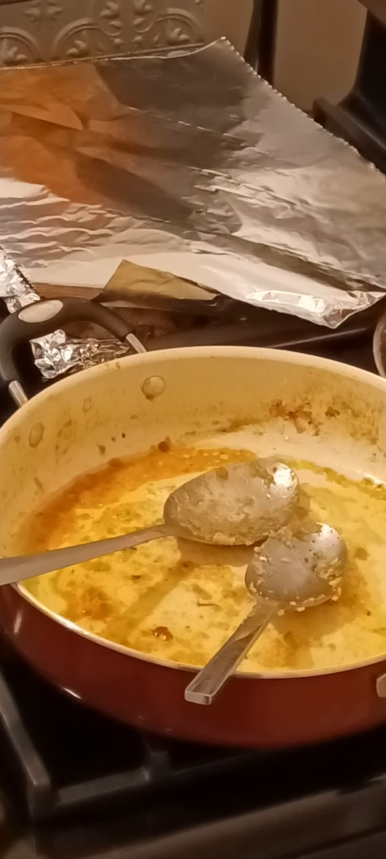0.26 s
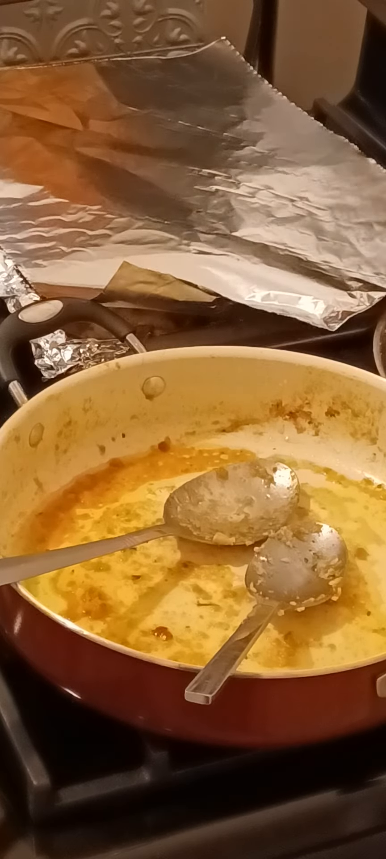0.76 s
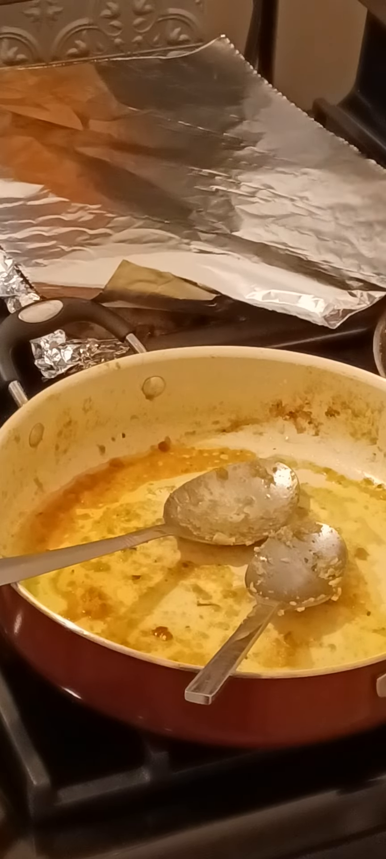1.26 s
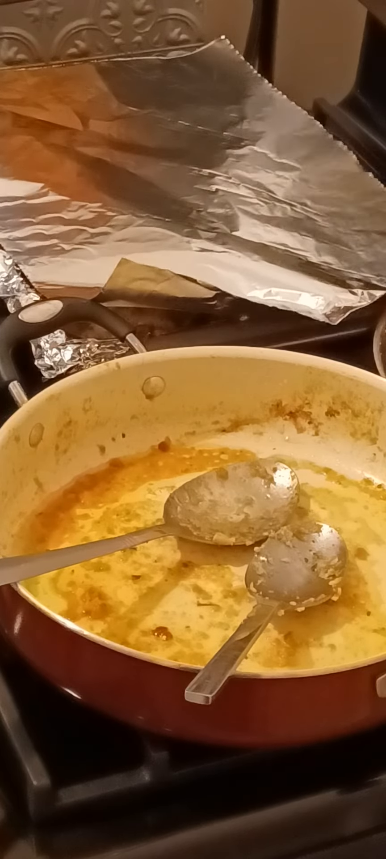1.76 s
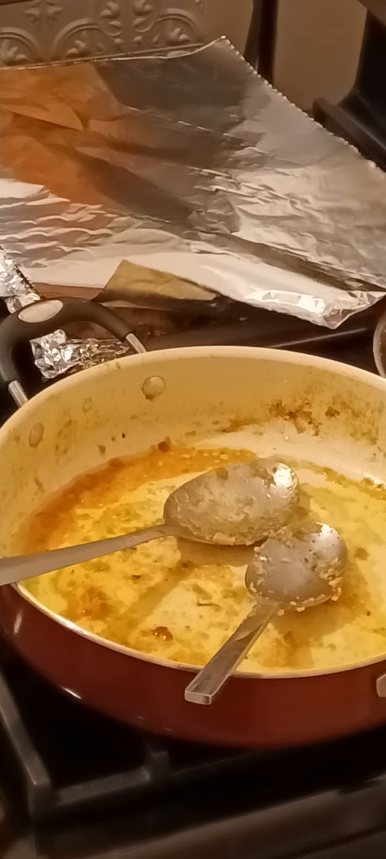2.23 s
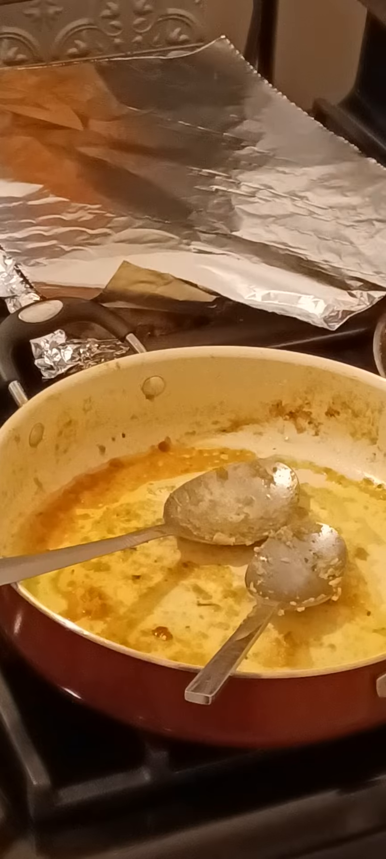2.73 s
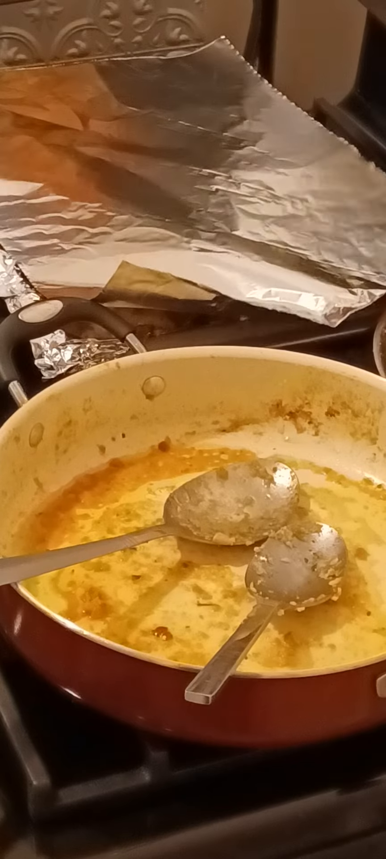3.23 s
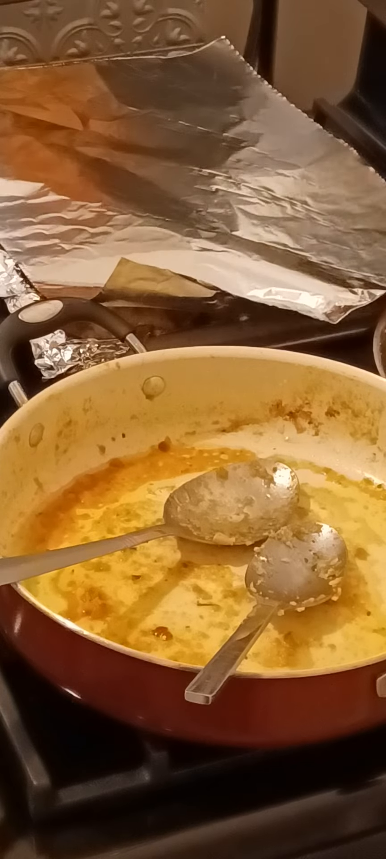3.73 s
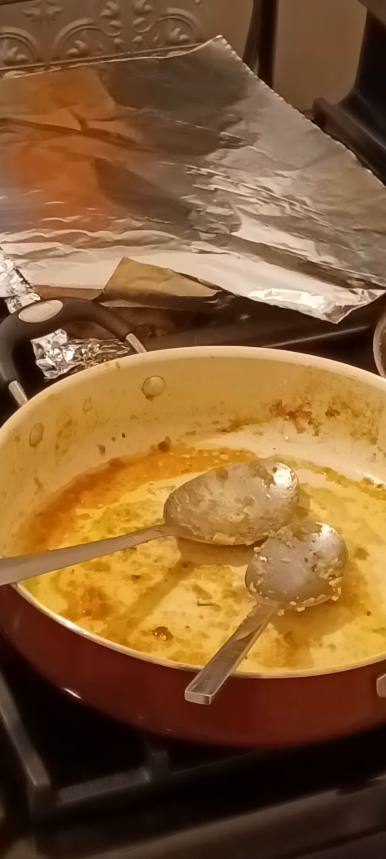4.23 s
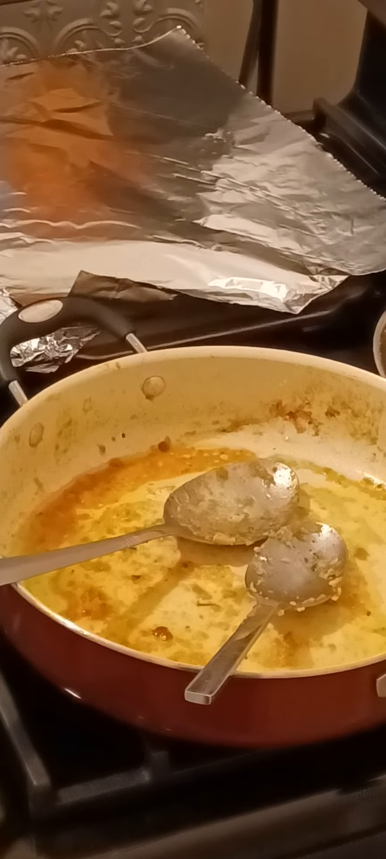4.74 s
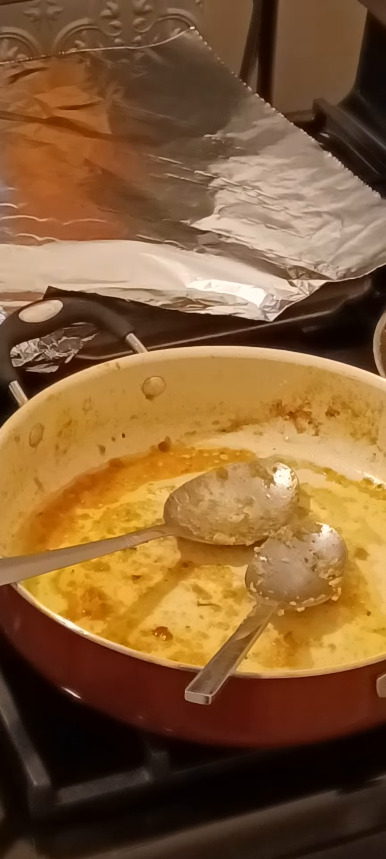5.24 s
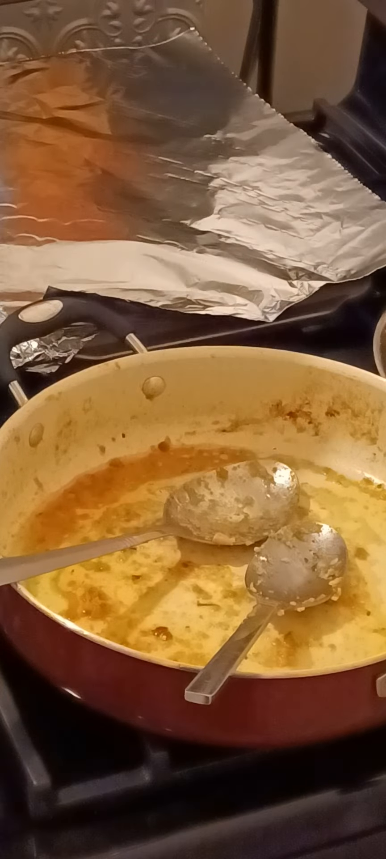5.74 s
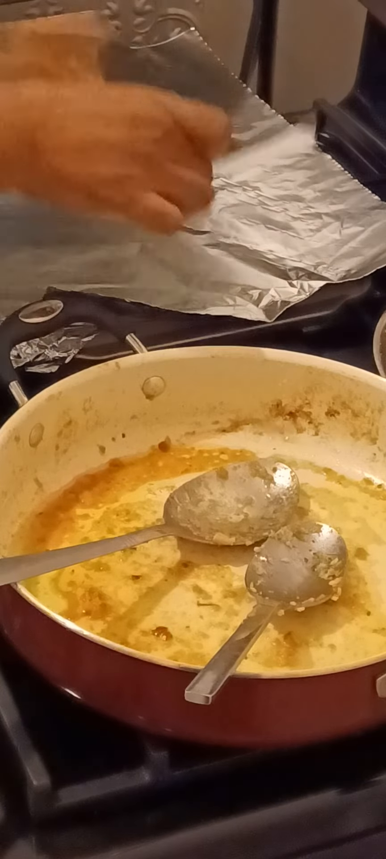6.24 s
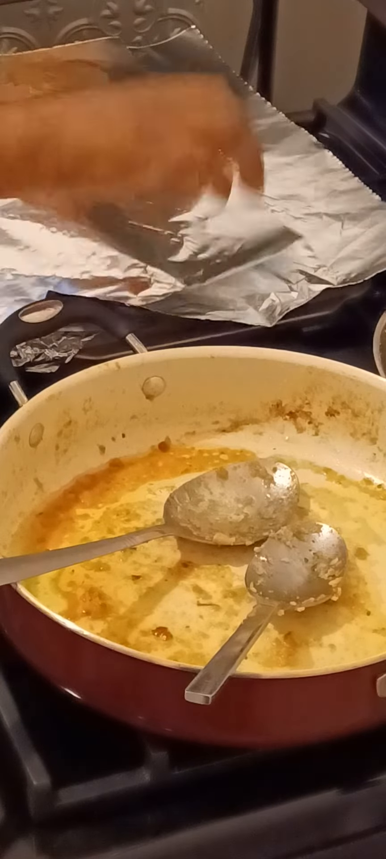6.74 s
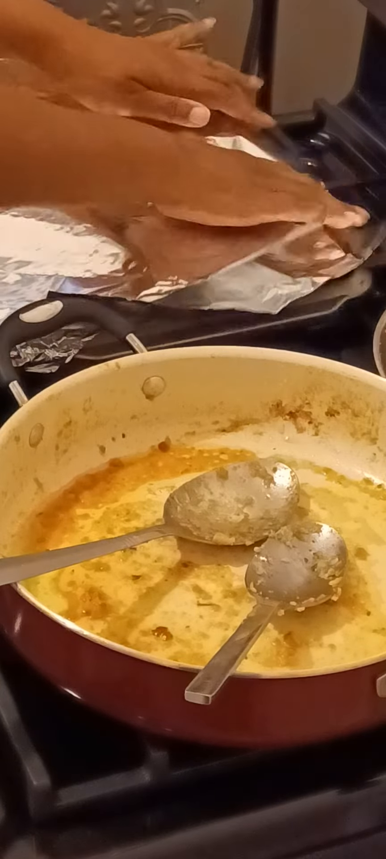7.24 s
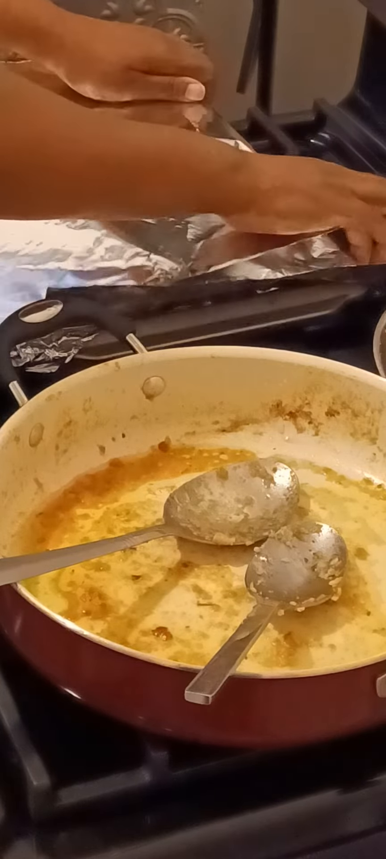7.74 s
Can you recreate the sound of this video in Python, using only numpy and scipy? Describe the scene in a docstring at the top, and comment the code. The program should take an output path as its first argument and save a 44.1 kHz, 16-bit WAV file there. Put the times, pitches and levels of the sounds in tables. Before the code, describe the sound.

Aluminium foil crinkles, is torn loudly off its roll, then laid over a dish and smoothed by hand, with a kitchen fan humming.

```python
"""Aluminium foil crackles off its roll over the hum of an extractor fan, in a small, hard-walled kitchen.
The sheet is torn along the box's saw edge, the box is put down, a dish slides over the stove, and the
sheet is carried across, laid on it and smoothed by hand. The crackle is snap-through buckling: thousands
of tiny impulses a second, blurred by reverberation. Punctures and knocks excite the box's resonances;
dish and palm sound by stick-slip friction. A phone's gain control ducks after the loud tear."""
import sys
import numpy as np
from scipy import signal
from scipy.fft import rfft, irfft
from scipy.io import wavfile
from scipy.ndimage import uniform_filter1d, minimum_filter1d

SR = 44100
rng = np.random.default_rng(int(sys.argv[2]) if len(sys.argv) > 2 else 0)


def inscribe(sig):
    """Save sig as 16-bit PCM at rate SR to the path in sys.argv[1].

    A 1-D sig is mono; a 2-D sig holds one channel per row.
    Samples are clipped to [-1, 1] before scaling.
    """
    pcm = np.round(np.clip(np.atleast_2d(sig).T, -1, 1) * 32767)
    wavfile.write(sys.argv[1], SR, pcm.astype(np.int16))


N = 351918
T = np.arange(N) / SR


def undb(db):
    """Amplitude ratio of a level in decibels."""
    return 10 ** (np.asarray(db) / 20)


def unit(x):
    """Normalisation to rms 1."""
    return x / np.sqrt(np.mean(x ** 2))


def curve(rows, column=1):
    """Linear interpolation of one table column over time."""
    rows = np.array(rows)
    return np.interp(T, rows[:, 0], rows[:, column])


def gesture(rows, column=1):
    """Amplitude envelope of a movement, silent outside its rows."""
    return undb(curve(rows, column)) * (T >= rows[0][0]) * (T <= rows[-1][0] + .01)


def along(points, hz):
    """Interpolation of (f/Hz, value) points on a log-frequency axis."""
    f, value = np.transpose(points)
    return np.interp(np.log(hz + 1), np.log(f), value)


def colour(x, points):
    """Spectral shaping by (f/Hz, level/dB) points, conserving the power of a white input."""
    hz = np.fft.rfftfreq(N, 1 / SR)
    return irfft(rfft(x) * unit(undb(along(points, hz))), N)


def drift(rate_hz):
    """Low-pass noise of rms 1: random values, each held for one period, smoothed twice."""
    hold = int(SR / rate_hz)
    steps = np.repeat(rng.standard_normal(N // hold + 1), hold)
    return unit(uniform_filter1d(uniform_filter1d(steps, hold), hold)[:N])


def clicks(per_s, spread_db):
    """Shot noise: random impulses, many small and a few large, with mean power near 1."""
    chance, size, sign = rng.random(N), rng.exponential(size=N), rng.choice([-1, 1], N)
    size = unit(undb(spread_db * np.minimum(size, 4)))
    probability = np.minimum(per_s / SR, 1)
    return (chance < probability) * sign * size / np.sqrt(probability)


# reverberation time of the kitchen: f/Hz, T60/s
ROOM_DECAY = [(100, .3), (500, 0.3), (2000, 0.38), (5000, 0.5), (10000, 0.33), (16000, 0.25)]
# level difference, left minus right: f/Hz, level/dB
STEREO_BALANCE = [(200, .5), (700, -0.6), (1300, -0.3), (2400, -0.5), (4400, 1.5), (8000, 2.3), (15000, 1)]

def kitchen(x, direct_db, lag):
    """Reverberation: direct sound, lag samples later on the right, then a decaying diffuse field."""
    t = T[:SR * 3 // 4]
    hz = np.fft.rfftfreq(len(t), 1 / SR)
    density = np.clip((t / .03) ** 2, .01, 1)  # reflections thicken with time squared
    echoes = rng.standard_normal((2, len(t))) * (rng.random((2, len(t))) < density)
    left, right = rfft(echoes / np.sqrt(density) * (t > .002))
    coherence = np.exp(-hz / 520)  # long waves reach both microphones alike
    field = np.array([left, coherence * left + np.sqrt(1 - coherence ** 2) * right])
    centres = np.geomspace(100, 16000, 9)
    response = 0
    for centre, weights in zip(centres, np.eye(len(centres))):
        fade = np.exp(-np.log(1000) * t / along(ROOM_DECAY, centre))
        band = np.interp(np.log(hz + 1), np.log(centres), weights)
        response = response + irfft(field * band, len(t)) * fade / np.sqrt(np.sum(fade ** 2))
    response[0, 0] += undb(direct_db)
    response[1, lag] += undb(direct_db)
    response /= np.sqrt(1 + undb(direct_db) ** 2)
    balance = undb(np.outer([.5, -.5], along(STEREO_BALANCE, hz)))
    response = irfft(rfft(response) * balance, len(t))
    return signal.fftconvolve(x[None], response, axes=1)[:, :N]


# weaker fan tones: multiple of the shaft rate, level/dB
SHAFT_HARMONICS = [(3, -63.5), (6, -59)]
# swells of the blade tone: centre t/s, half-width/s, gain/dB
BLADE_SWELLS = [(.68, .16, 7), (1.32, .16, 7), (2.38, .2, 5.5), (3.25, .08, 13), (3.68, .07, 11),
                (4.6, .18, 13), (5.62, .08, 11), (7.25, .05, 8), (7.65, .16, 9)]
# rumble of the moving air: f/Hz, level/dB
AIR_SPECTRUM = [(25, -31), (46, -24), (60, -16), (92, -3.5), (135, -5), (190, 1.5), (260, 1.5), (330, -2.5),
                (480, -11), (760, -11.5), (950, -19), (1250, -18), (2000, -31), (5000, -42), (15000, -56)]

def fan(shaft_hz=55.57, blade_count=4, blade_db=-54, eddy_db=-55, eddy_width_hz=30, air_db=-47.2):
    """Blade-passing tone over rumbling air: turbulence modulates it and spreads a skirt of noise."""
    turns = np.cumsum(shaft_hz * (1 + .001 * drift(3))) / SR
    phase = 2 * np.pi * blade_count * turns
    swell_db = sum(db * np.exp(-((T - s) / half) ** 2) for s, half, db in BLADE_SWELLS)
    blades = undb(blade_db + swell_db + 2.5 * drift(12)) * np.sin(phase + .4 * drift(22))
    skirt = drift(eddy_width_hz) * np.sin(phase) + drift(eddy_width_hz) * np.cos(phase)
    tones = sum(undb(db + 3.4 * drift(9)) * np.sin(2 * np.pi * k * turns + .8 * drift(14))
                for k, db in SHAFT_HARMONICS)
    mid, side = colour(rng.standard_normal((2, N)), AIR_SPECTRUM) * undb(air_db + .8 * drift(5))
    hum = np.sqrt(2) * (blades + tones) + undb(eddy_db) * skirt
    left, right = hum + .96 * mid + .22 * side, hum + .8 * mid - .3 * side
    return np.array([left, np.roll(right, 6)])


# the dish sliding on the stove: t/s, level/dB
DISH_SLIDE = [(4.32, -59), (4.37, -48.5), (4.42, -45), (4.46, -50), (4.5, -45.5), (4.58, -49), (4.67, -48),
              (4.74, -62)]
# its scrape: f/Hz, level/dB
DISH_SPECTRUM = [(50, -35), (150, -14), (230, 1), (330, 2.5), (440, -9), (530, -1.5), (850, -9), (1100, -4),
                 (1700, -7.5), (2400, -20), (5000, -38), (15000, -58)]
# a palm pressing the sheet onto the rim: t/s, level/dB
PALM_STROKE = [(7.18, -65), (7.205, -41.5), (7.25, -43), (7.32, -47), (7.5, -50), (7.68, -42.5),
               (7.85, -46.5), (7.98, -53)]
# its rub: f/Hz, level/dB
PALM_SPECTRUM = [(40, -35), (150, -21), (280, -4), (420, -11), (560, 4.5), (750, -4), (1130, 3.5),
                 (1500, -3.5), (3000, -13), (15000, -50)]

def friction():
    """Stick-slip friction: dense, uneven slips of dish over stove, then of palm over foil."""
    dish = colour(clicks(2500, spread_db=0), DISH_SPECTRUM) * gesture(DISH_SLIDE) * undb(.97 * drift(35))
    palm = colour(clicks(3000, spread_db=3.5), PALM_SPECTRUM) * gesture(PALM_STROKE)
    palm *= undb(1.9 * drift(25))
    return kitchen(dish + palm, direct_db=-8, lag=24)


# the box striking the counter: t/s, level/dB, relative thud level/dB, f/Hz favoured by the contact point
BOX_IMPACTS = [(1.753, -33.5, -8, 241), (2.717, -34.5, -22, 500), (2.766, -28, -11, 285),
               (2.794, -35, -12, 305), (2.835, -44.5, -5, 262)]
# modes rung by an impact: f/Hz, level/dB, T60/s
IMPACT_MODES = [(263, 0, .17), (305.6, 0, 0.19), (430, 1, 0.19), (502, 0.5, .12), (590, -15, .12),
                (797, 0, 0.16), (877, -2, .12), (1098, -13, 0.12), (1395, -8, 0.089)]
# thud of the counter: f/Hz, level/dB
THUD_SPECTRUM = [(30, -42), (45, -26), (62, 3), (85, -3), (130, -6), (200, -1), (350, -9), (900, -30)]
# dry scuff of cardboard: f/Hz, level/dB
SCUFF_SPECTRUM = [(100, -30), (450, -2), (900, -1), (1400, -3), (2500, -11), (8000, -40)]

def knocks(push_s=.0017, thud_s=.057, scuff_s=.048, scuff_db=-7):
    """Impact excitation: soft blows scuff the box, ring its damped modes and shake the counter."""
    out, t = np.zeros(N), T[:SR // 2]
    counter = colour(rng.standard_normal(N), THUD_SPECTRUM)
    cardboard = colour(rng.standard_normal(N), SCUFF_SPECTRUM)
    for s, db, thud_db, favoured_hz in BOX_IMPACTS:
        span = slice(int(s * SR), int(s * SR) + len(t))
        blow = undb(thud_db) * counter[span] * np.exp(-t / thud_s)
        blow += undb(scuff_db) * cardboard[span] * np.exp(-t / scuff_s)
        for hz, mode_db, t60 in IMPACT_MODES:
            lift_db = 12 * np.exp(-(np.log2(hz / favoured_hz) / .23) ** 2)
            phase = 2 * np.pi * hz * (1 + .012 * rng.standard_normal()) * t
            blow += undb(mode_db + lift_db - 3.5) * np.sin(phase) * np.exp(-np.log(1000) * t / t60)
        out[span] += undb(db) * blow * (1 - np.exp(-t / push_s))
    return kitchen(out, direct_db=4.5, lag=7)


# the roll squeaking in its box before the tear: t/s, f/Hz, level/dB
ROLL_SQUEAK = [(1.22, 473, -70), (1.29, 461, -54), (1.37, 463, -52), (1.45, 468, -48), (1.53, 480, -43.5),
               (1.59, 450, -56), (1.63, 437, -66)]
# the tear along the saw edge: t/s, level/dB, f/Hz of the freed flap, falling as it grows
TEAR_PATH = [(1.6, -51, 1200), (1.632, -24, 1800), (1.65, -16, 1850), (1.7, -23, 1960), (1.712, -9, 1420),
             (1.728, -15.5, 1400), (1.745, -22, 650), (1.79, -19, 990), (1.84, -19.5, 890),
             (1.885, -25.5, 400), (1.92, -46, 370)]
# resonances of the cardboard box: f/Hz, bandwidth/Hz, level/dB
BOX_RESONANCES = [(353, 30, 3), (418, 40, 2.5), (551, 32, 1.5), (755, 110, -2), (874, 44, -2),
                  (1038, 74, 1), (1417, 92, 0.5), (1485, 80, 1.5), (1740, 320, -2.5), (2040, 240, -1)]
# the box shaking under the teeth: f/Hz, level/dB
SHUDDER_SPECTRUM = [(30, -50), (55, -26), (100, -5), (170, 2), (280, -3), (600, -25)]

def tear(teeth_per_s=1100, shudder_db=-19):
    """Forced vibration: the roll squeaks, then punctures drive the box, most near the flap's pitch."""
    highpass = signal.butter(3, 260, "high", fs=SR, output="sos")
    punctures = signal.sosfilt(highpass, clicks(teeth_per_s, spread_db=1.5))
    flap_hz = curve(TEAR_PATH, 2)
    rasp = 0
    for k, (hz, width, db) in enumerate(BOX_RESONANCES):
        ring = signal.lfilter(*signal.iirpeak(hz, hz / width, SR), punctures)
        lift_db = 7 * np.exp(-(np.log2(hz / flap_hz) / .37) ** 2)
        rasp = rasp + (-1) ** k * undb(db + lift_db) * ring
    squeak_hz = curve(ROLL_SQUEAK) * (1 + .012 * drift(90))
    squeak = np.sin(2 * np.pi * np.cumsum(squeak_hz) / SR) * gesture(ROLL_SQUEAK, 2)
    shudder = colour(clicks(teeth_per_s, spread_db=1.5), SHUDDER_SPECTRUM) * undb(shudder_db)
    rip = (unit(rasp) + shudder) * gesture(TEAR_PATH) * undb(-.5)
    return kitchen(rip + squeak * undb(2 * drift(40.6)), direct_db=-8.5, lag=11)


# crackle as the hands draw, tear, sway, carry, lay and smooth the sheet:
# start t/s, rise/s, hold/s, time to fall 20 dB/s, level/dB
HAND_FLURRIES = [ (0.049, .01, .03, .06, -43), (0.193, .018, .01, .07, -37), (0.305, .065, .02, .17, -35),
                 (0.5, .16, .06, 1.15, -31), (1.153, .03, .02, .32, -34), (1.362, .025, .1, .11, -41.5),
                 (1.534, .03, .06, .1, -29.5), (1.613, .055, .08, .1, -12.5), (1.75, .025, .1, .08, -17.5),
                 (1.946, .04, .07, .23, -32.5), (2.093, .045, .02, .28, -30.5), (2.32, .025, .01, .12, -42),
                 (2.463, .03, .02, .09, -37), (2.587, .04, .04, .39, -30.5), (2.838, .04, .02, .07, -40.5),
                 (3.134, .02, .05, .22, -38.7), (3.409, .015, .01, .15, -39.8),
                 (3.547, .04, .01, .07, -44.3), (3.668, .03, .01, .22, -46.5),
                 (3.933, .08, .04, .24, -39.5), (4.012, .03, .025, .1, -32), (4.434, .125, .02, .21, -54),
                 (4.795, .05, .12, .11, -50.5), (4.962, .04, .12, .1, -41.5), (5.129, .04, .01, .25, -31.5),
                 (5.243, .03, .02, .26, -33), (5.469, .035, .01, .27, -34.5), (5.656, .1, .15, .13, -33),
                 (5.909, .02, .01, .06, -23), (5.96, .04, .16, .2, -30), (6.176, .095, .05, .16, -27),
                 (6.472, .03, .01, .04, -41), (6.613, .175, .02, .035, -33.5),
                 (7.006, .01, .02, .03, -51.5), (7.179, .065, .01, .11, -28.5), (7.302, .03, .63, .2, -38),
                 (7.92, .035, .04, .1, -35)]

def crackle_level(held_db=-60, laid_s=6.88, laid_db=-72):
    """Incoherent addition: flurries rise, hold and fade, and their powers sum to one level in dB."""
    power = undb(np.where(T < laid_s, held_db, laid_db)) ** 2  # the sheet trembles faintly while held
    for start, rise, hold, fade, db in HAND_FLURRIES:
        age = T - start
        fall_db = -20 * np.clip((age - rise - hold) / fade, 0, 10)
        power = power + np.clip(age / rise, 0, 1) * undb(db + fall_db) ** 2
    return 10 * np.log10(power)


# creases snapping: f/Hz, level/dB
CREASE_SPECTRUM = [(300, -60), (1500, -28), (3000, -6.5), (4500, -4), (6000, -1.5), (8700, -3), (12500, -4),
                   (15800, -15)]
# fine fizz of the hardest snaps: f/Hz, level/dB
FIZZ_SPECTRUM = [(1000, -61), (6000, -22), (9000, -6), (11000, -1.5), (13000, 5), (15800, -1.5)]
# wider panels flexing: f/Hz, level/dB
PANEL_SPECTRUM = [(40, -51), (250, -23), (500, -10.5), (850, -7.5), (1300, -3.5), (1850, -3), (2400, -3),
                  (3300, -4), (4500, -7.5), (8000, -16), (15000, -40)]
# how freely the panels flex: t/s, level/dB
PANEL_SLACK = [(0, -3.8), (.4, -1.3), (1.5, -3), (1.72, 2.5), (1.95, -3.3), (2.7, -4.2), (3.7, -3),
               (4.05, -6.5), (4.35, -3.5), (4.9, -7.5), (5.4, -4.3), (6.3, -6), (6.85, -5), (7.12, -13),
               (7.24, -4.8), (7.98, -1.5)]
# tinny resonance of each patch of the sheet: f/Hz
PATCH_RESONANCES = [1740, 2220, 2920, 3910, 4870, 6270]

def foil(ordinary_db=-35, panel_lag_s=.04, ring_db=1, ring_q=6):
    """Snap-through buckling: creases snap and flex the panels, faster and brighter with more effort."""
    level_db = crackle_level()
    effort_db = np.clip(level_db - ordinary_db, -24, 14)
    # the panels follow the creases late, so each flurry starts bright and ends dull
    follow = 1 / (panel_lag_s * SR)
    late_db = signal.lfilter([follow], [1, follow - 1], effort_db, zi=effort_db[:1])[0]
    surge_db = effort_db - late_db
    flex_db = curve(PANEL_SLACK) - .36 * effort_db - .45 * surge_db - 2.5  # gentle moves favour panels
    fizz_db = -7 + .43 * effort_db + .3 * np.minimum(surge_db, 10)  # the first snaps are the sharpest
    snaps_per_s = 540 * undb(.5 * effort_db)
    out = 0
    for patch, hz in enumerate(PATCH_RESONANCES):
        snaps = clicks(snaps_per_s, spread_db=4)
        flexes = .56 * snaps + .8 * clicks(snaps_per_s, spread_db=3.5)
        creases = colour(snaps, CREASE_SPECTRUM) * undb(-3.5)
        fizz = colour(snaps, FIZZ_SPECTRUM) * undb(fizz_db)
        panels = colour(flexes, PANEL_SPECTRUM) * undb(flex_db)
        sheet = creases + fizz + panels
        # a patch rings more or less as it is pulled taut and let go
        ring = signal.lfilter(*signal.iirpeak(hz, ring_q, SR), sheet) * undb(ring_db + 3.37 * drift(11))
        flicker_db = 1.24 * drift(70)
        out = out + kitchen((sheet + ring) * undb(level_db + flicker_db), direct_db=-9, lag=22 - patch)
    return out / np.sqrt(len(PATCH_RESONANCES))


def gain_control(x, threshold_db=-22, slope=.49, window_s=.03, hold_s=.7, recover_db_per_s=5.2):
    """Dynamic compression: a loud sound lowers the gain at once; it stays down, then creeps back."""
    power = uniform_filter1d(np.mean(x ** 2, axis=0), int(window_s * SR))
    cut_db = slope * np.maximum(10 * np.log10(np.abs(power) + 1e-12) - threshold_db, 0)
    half = int(hold_s * SR / 2)
    held_db = -minimum_filter1d(-cut_db, 2 * half + 1, origin=half, mode="nearest")
    recovery_db = recover_db_per_s * T
    return x * undb(recovery_db - np.maximum.accumulate(held_db + recovery_db))


def scene():
    """Superposition: the pressures of all sources at the stove add."""
    return foil() + tear() + knocks() + friction() + fan()


def record(dry, cutoff_hz=15850):
    """Compression and band limiting: the phone ducks after the tear and cuts the highest treble."""
    lowpass = signal.ellip(10, .05, 60, cutoff_hz, fs=SR, output="sos")
    return signal.sosfiltfilt(lowpass, gain_control(dry))


dry = scene()
out = record(dry)
inscribe(out)
```